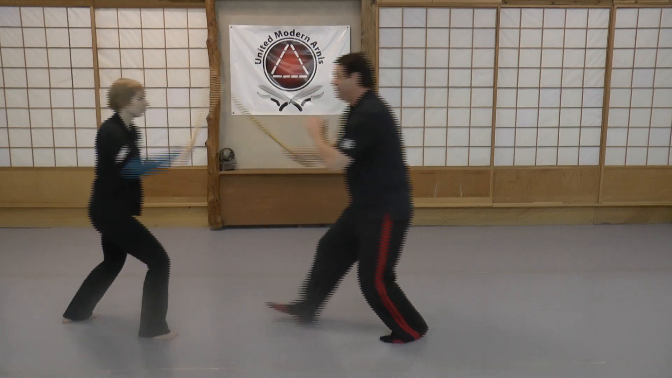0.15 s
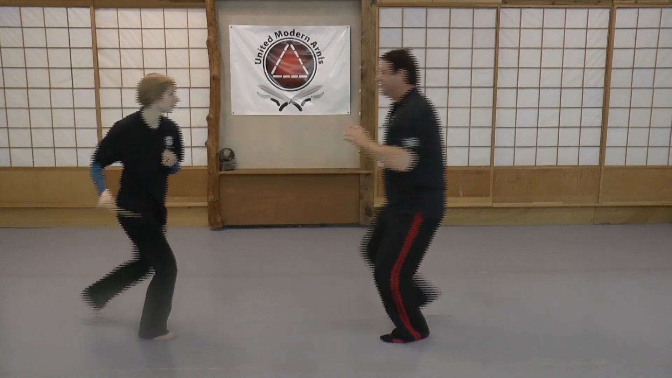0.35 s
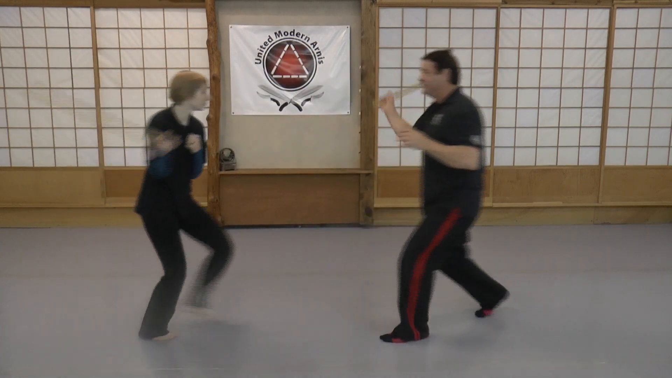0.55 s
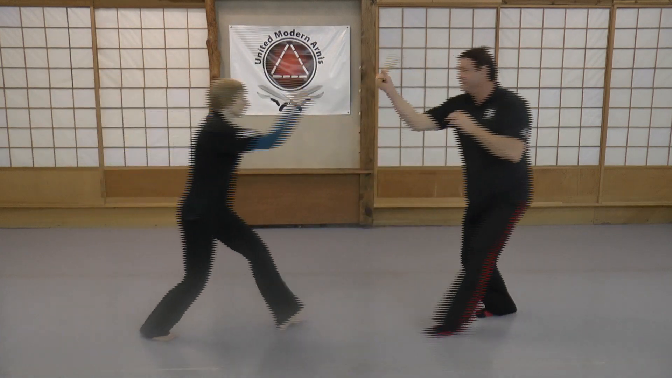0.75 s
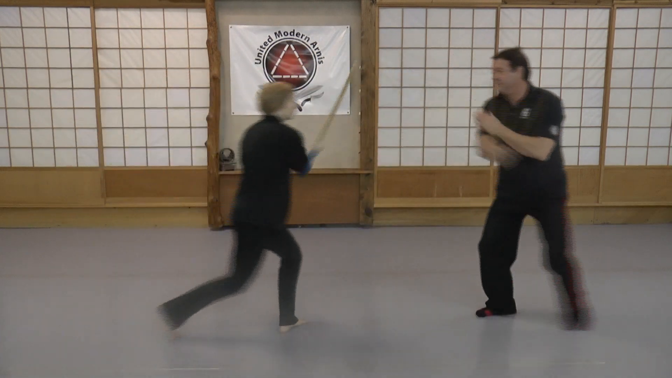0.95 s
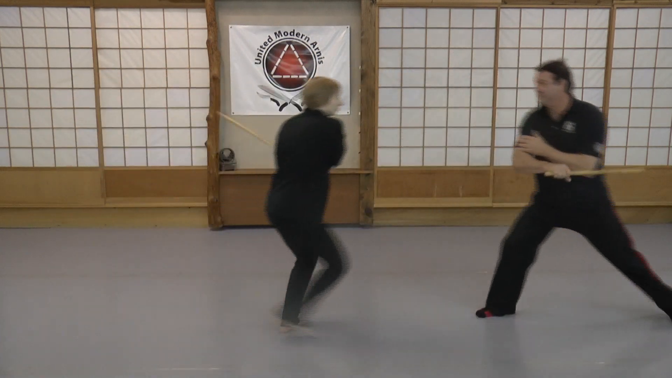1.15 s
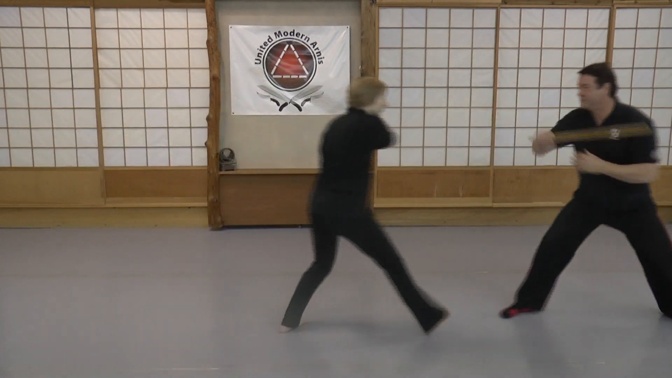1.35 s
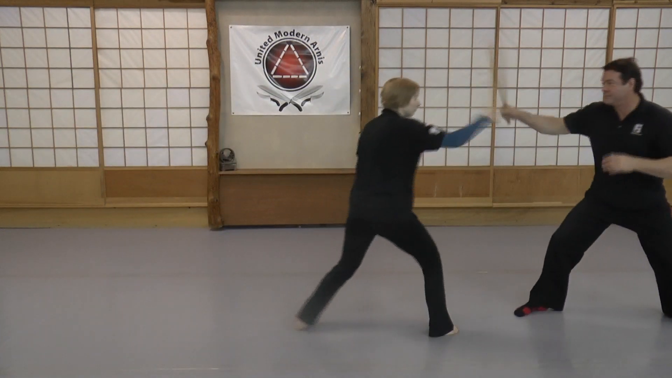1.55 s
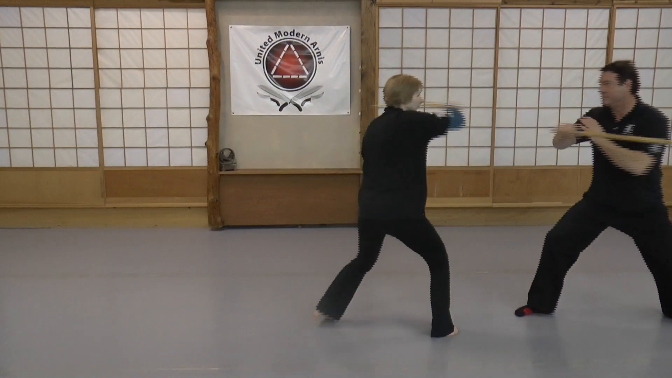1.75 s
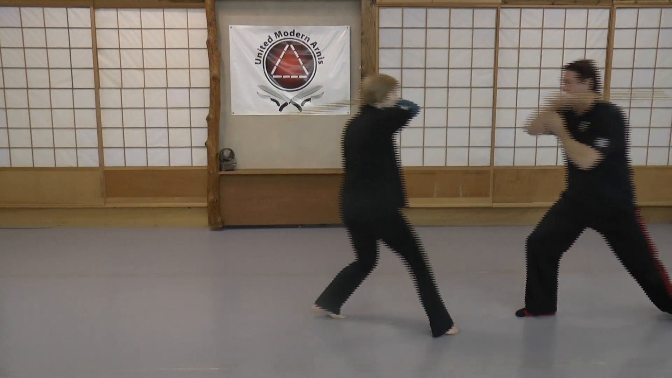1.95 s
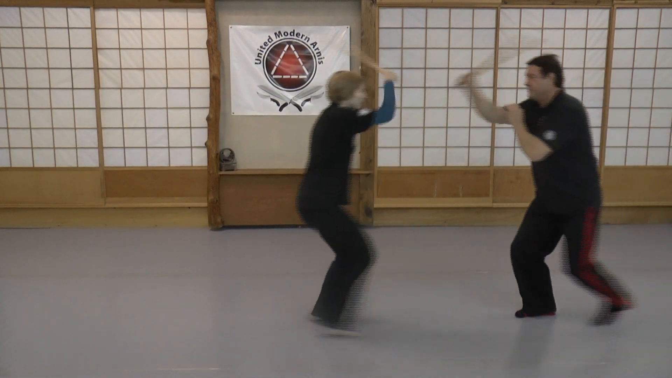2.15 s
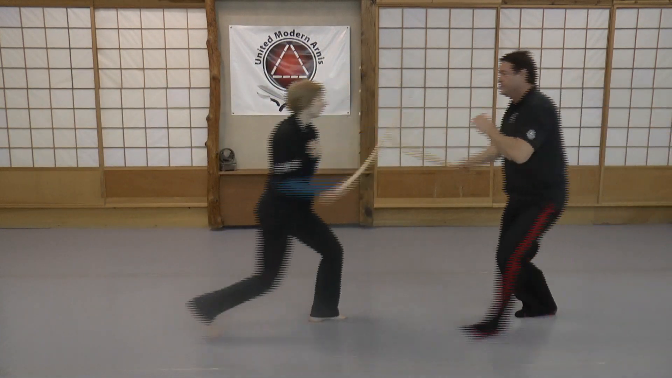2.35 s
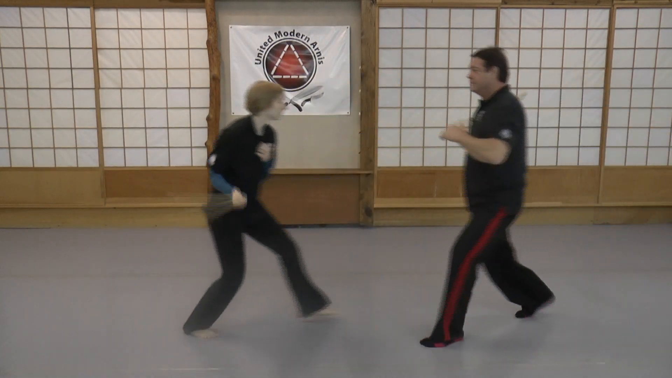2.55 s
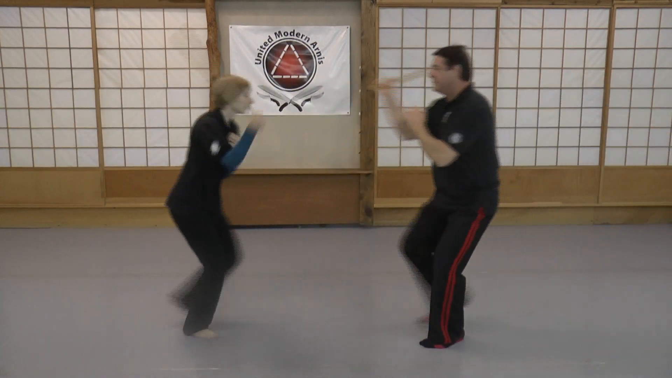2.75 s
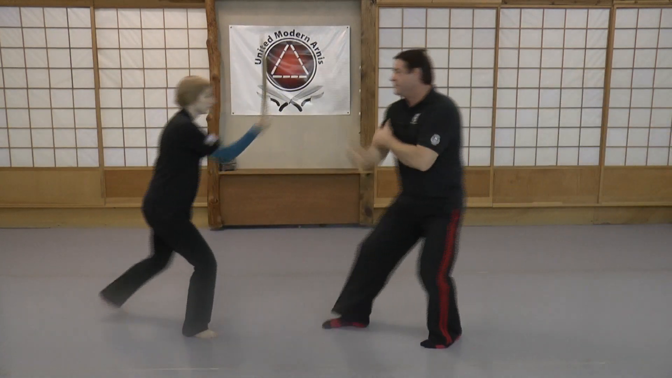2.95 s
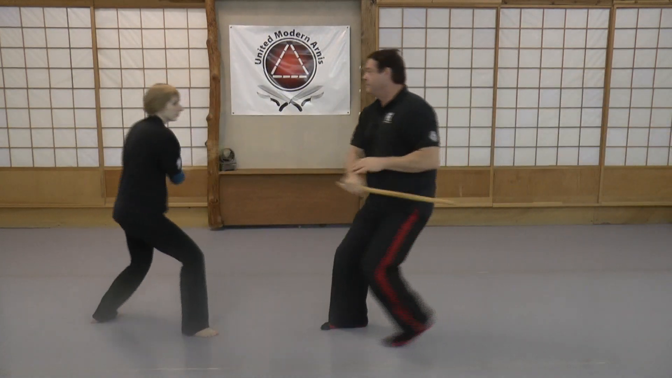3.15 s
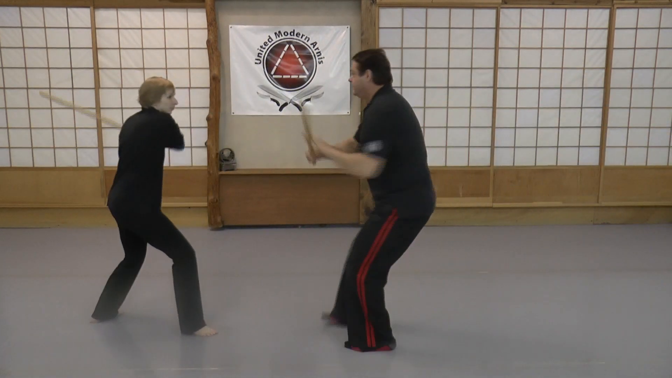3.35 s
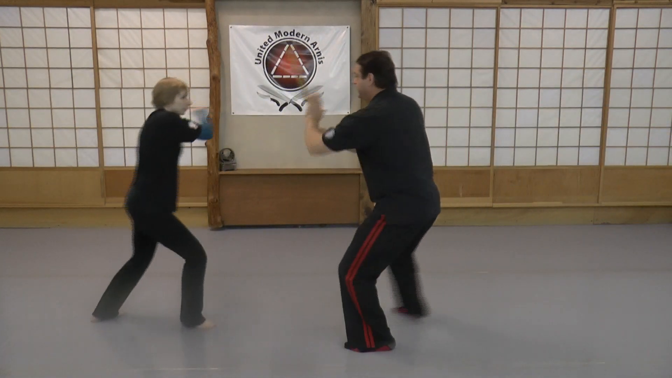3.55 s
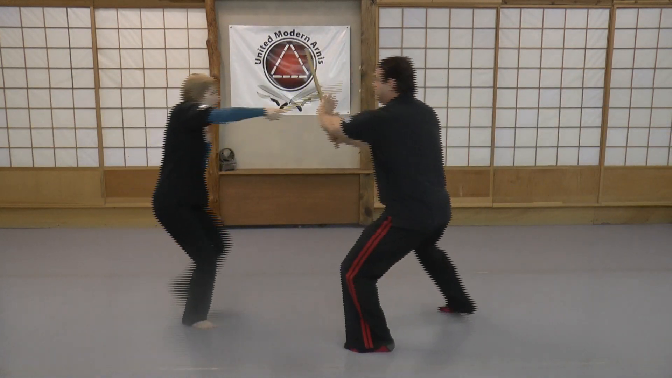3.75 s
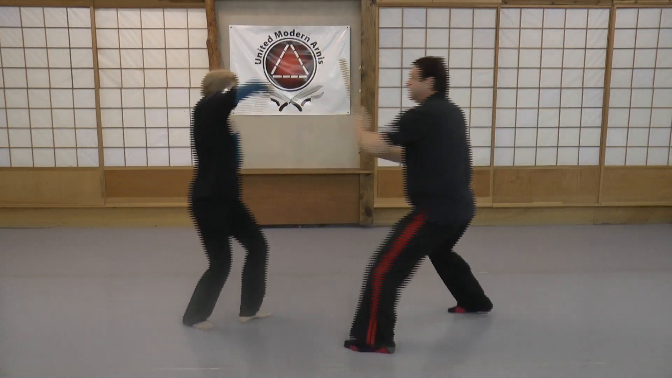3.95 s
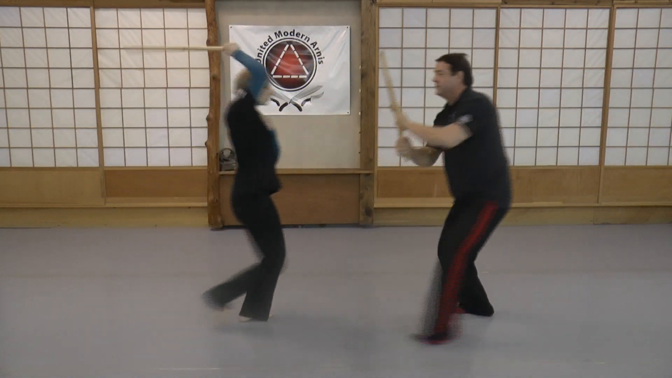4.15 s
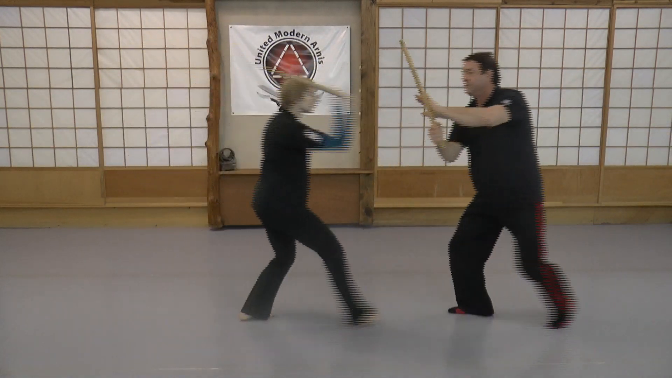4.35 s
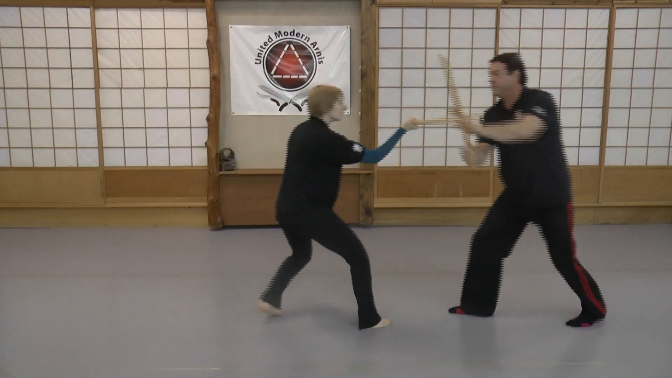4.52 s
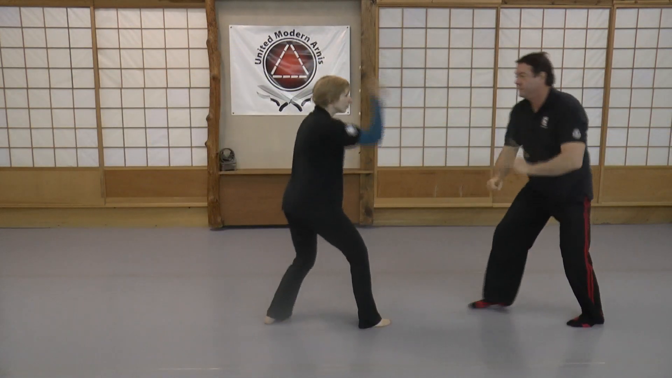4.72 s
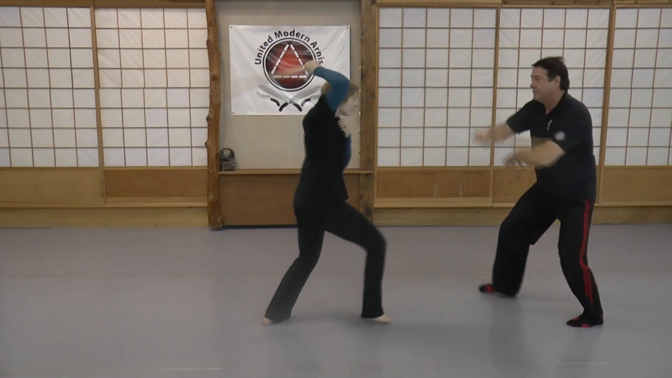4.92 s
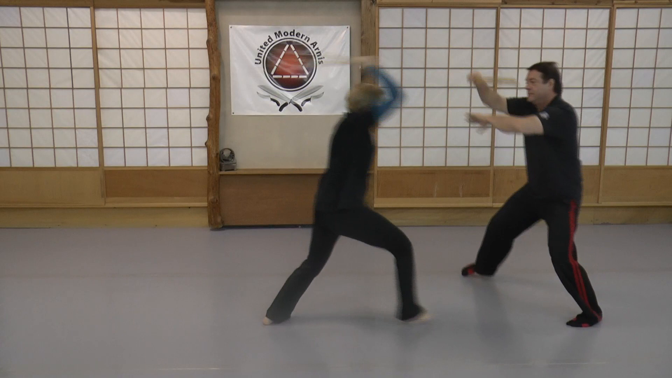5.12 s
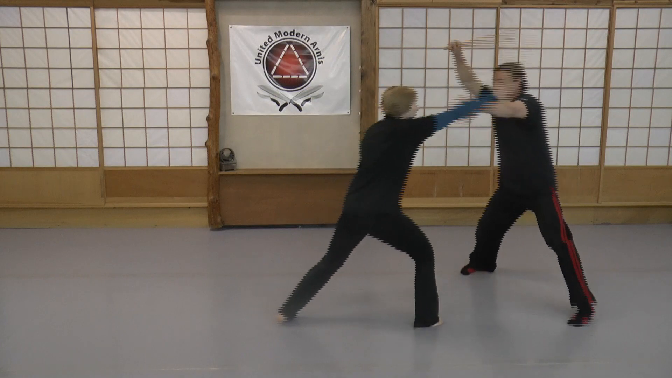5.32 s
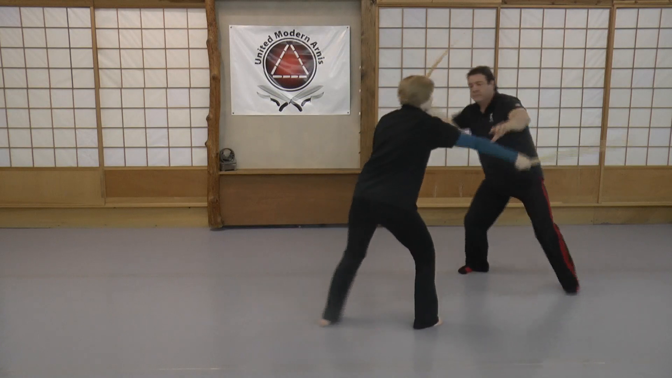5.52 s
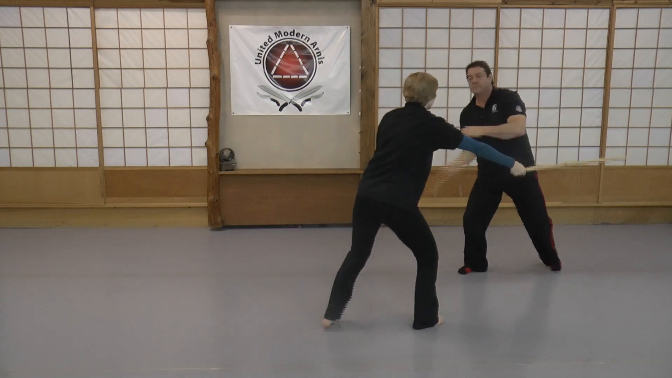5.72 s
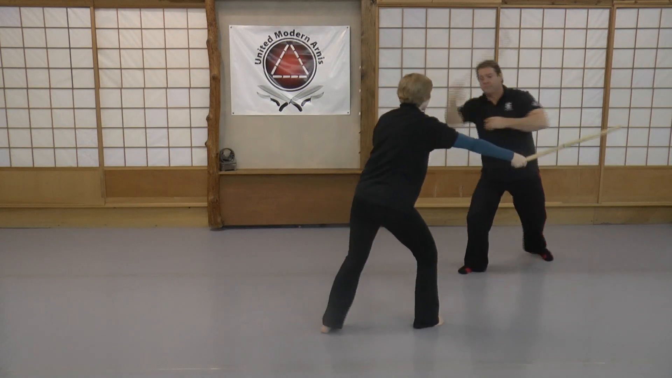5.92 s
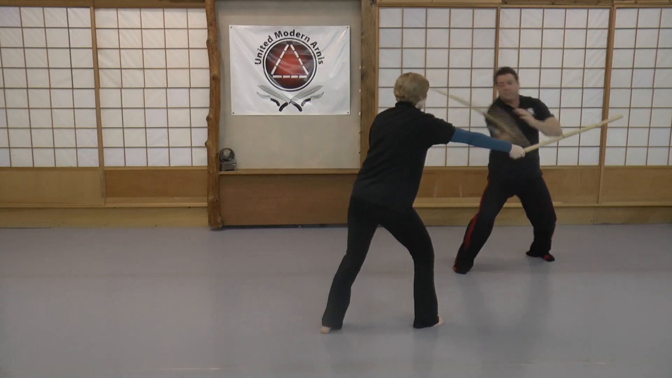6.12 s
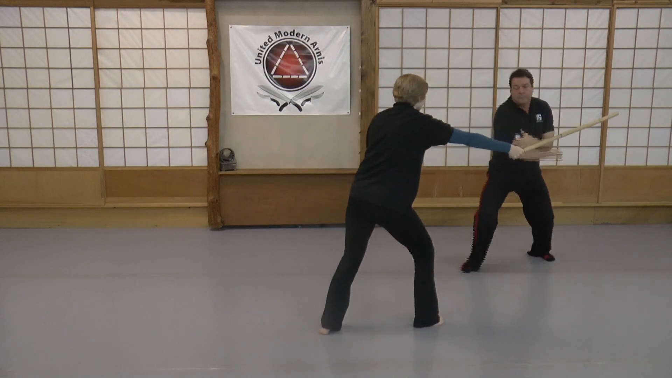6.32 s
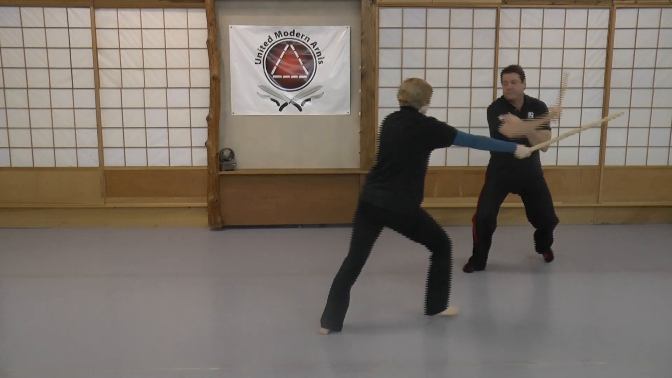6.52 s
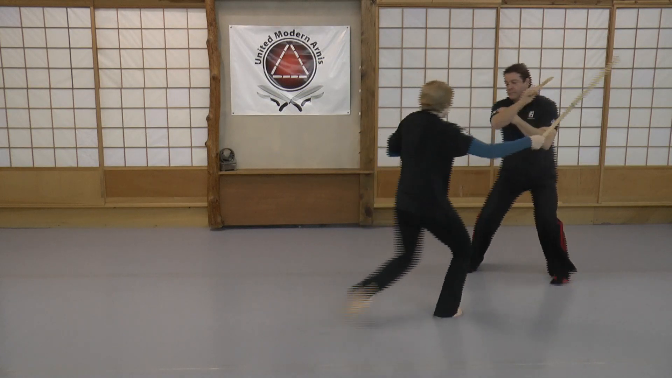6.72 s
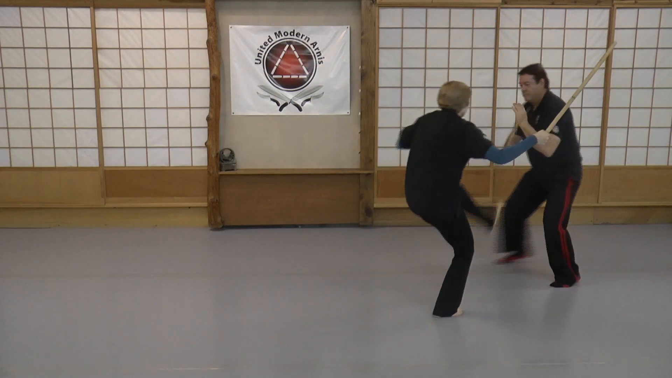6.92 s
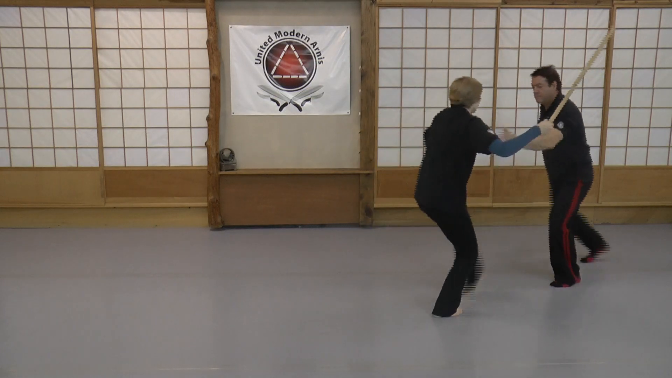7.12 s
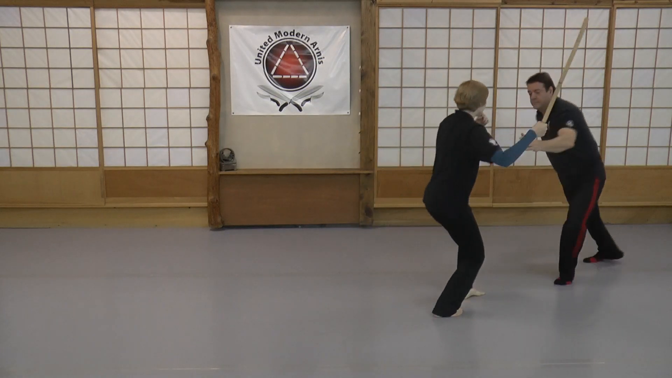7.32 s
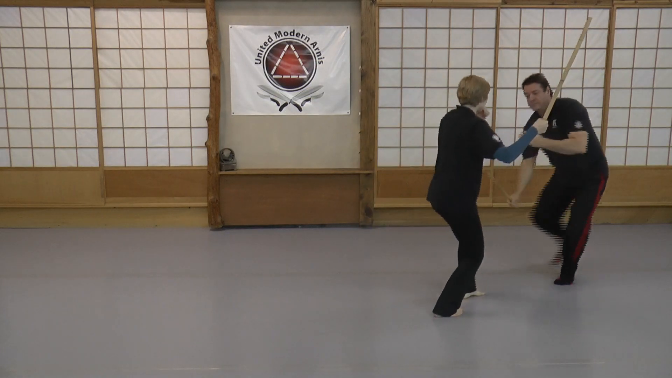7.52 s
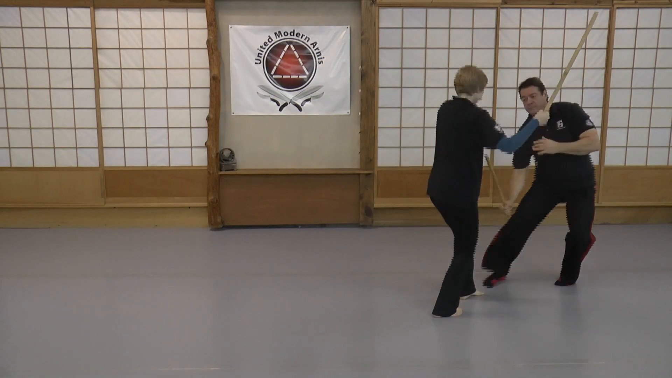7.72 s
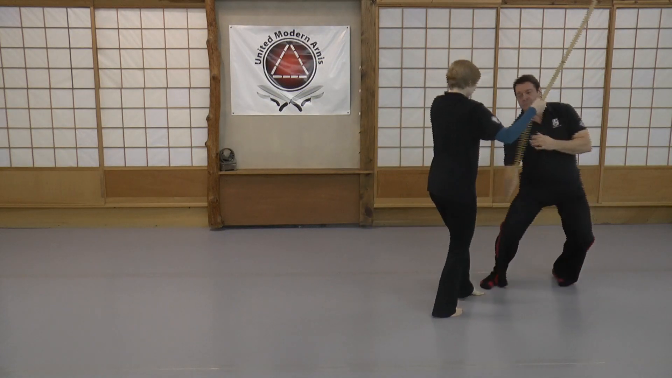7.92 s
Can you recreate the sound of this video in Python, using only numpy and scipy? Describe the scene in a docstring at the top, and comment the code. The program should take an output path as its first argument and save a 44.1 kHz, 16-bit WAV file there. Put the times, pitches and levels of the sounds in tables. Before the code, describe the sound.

A brisk two-person stick drill on a sprung floor: sharp, woody cracks with a short rattling contact and quick wall echoes, mixed with dull stamps, light scuffs and low rumble as weight shifts. The fifth crack is strongest, the later ones drier. The clacking then stops, leaving rustling clothes, a small close pat, a firm thud and fading room tone. The left side carries the action, squashed by automatic levelling; the right is nearly silent hiss.

```python
"""Stick drill in a training hall

Two people clack wooden sticks together, stamp and scuff on the mat, and land one dry pat on a forearm.
Each blow is a filtered click smeared by tiny contacts; the hall answers with a fading tail of noise.
The floor rumble and the sliding cloth are noise that swells with each movement. A fast limiter on the
left channel flattens each crack, so the hall swells up behind it; the right channel holds only hiss."""
import sys
import numpy as np
from scipy import signal
from scipy.fft import rfft, irfft, next_fast_len
from scipy.io import wavfile
from scipy.ndimage import uniform_filter1d, minimum_filter1d

SR = 44100
rng = np.random.default_rng(int(sys.argv[2]) if len(sys.argv) > 2 else 0)


def bounce(signal):
    """Save signal as a 16-bit WAV file at the path given by the first command-line argument."""
    frames = np.transpose(np.atleast_2d(signal))
    limited = np.clip(frames, -1, 1)
    pcm = np.round(limited * 32767).astype(np.int16)
    wavfile.write(sys.argv[1], SR, pcm)


N = 356003  # length in samples, about 8 s
# Source levels are those before the limiter. Levels in spectrum tables are relative.


def amp(db):
    """Turns dB into a plain multiplying factor."""
    return 10 ** (np.asarray(db) / 20)


def unit(x):
    """Scales a sound to rms 1."""
    return x / np.sqrt(np.mean(x ** 2) + 1e-20)


def read(points, hz):
    """Reads a table of (f/Hz, value), joined by straight lines on a log-frequency axis."""
    f, value = np.transpose(points)
    return np.interp(np.log(hz + 1), np.log(f + 1), value)


def add(mix, s, sound):
    """Mixes a sound in at time s, cutting it off at the end of the mix."""
    part = mix[max(round(s * SR), 0):][:len(sound)]
    part += sound[:len(part)]


def colour(x, gain_db, size=4096):
    """Filters a sound by a gain in dB that depends on frequency, with no sound ahead of the input."""
    hz = abs(np.fft.fftfreq(size, 1 / SR))
    log_gain = np.log(amp(gain_db(hz)))
    # minimum phase: the response starts at once
    spectrum = np.exp(np.conj(signal.hilbert(log_gain)))
    taps = np.fft.ifft(spectrum).real
    return signal.fftconvolve(x, taps[:size // 2])[:len(x)]


def noise(spectrum):
    """Steady noise of rms 1 with the given spectrum."""
    size = next_fast_len(N)
    hz = np.fft.rfftfreq(size, 1 / SR)
    shaped = rfft(rng.standard_normal(size)) * amp(read(spectrum, hz))
    return unit(irfft(shaped, size)[:N])


def sized(x, db):
    """Scales a blow so that its energy equals 10 ms at the given level."""
    return amp(db) * np.sqrt(SR / 100) * x / np.linalg.norm(x)


def knock(spectrum, db, size=2048):
    """One damped blow: a click filtered to the given spectrum and set to a level."""
    click = signal.unit_impulse(size)
    return sized(colour(click, lambda f: read(spectrum, f)), db)


def chatter(seconds, size=2048, count=10):
    """A short run of irregular micro-contacts with a nearly even spectrum and energy 1."""
    t = np.arange(size) / SR
    touching = np.exp(-(t / max(seconds, 1e-4)) ** 4)
    burst = rng.standard_normal(size)
    for _ in range(count):
        # keep the phases but make every frequency equally strong
        burst = irfft(np.exp(1j * np.angle(rfft(burst * touching))))
    burst = burst * touching
    return burst / np.linalg.norm(burst)


def rubbing(moves, spectrum, rise_s, fall_s, rest_db, lumpy_db):
    """Lumpy noise that swells into each movement of the bodies, holds, and dies away."""
    t = np.arange(N) / SR
    power = amp(rest_db) ** 2
    for start, length, db in moves:
        before = np.maximum(start - t, 0) / rise_s
        after = np.maximum(t - start - length, 0) / fall_s
        power = power + (amp(db) * np.exp(-before - after)) ** 2
    lumps = noise([(1, 0), (25, 0), (80, -40), (400, -100)])  # slow wobble, mostly below 25 Hz
    return noise(spectrum) * np.sqrt(power) * amp(lumpy_db * lumps)


# how fast the hall falls silent in each band: (f/Hz, time to fall by 60 dB t/s)
HALL_T60 = [(60, 1.1), (150, 1.77), (350, 1.584), (800, 1.14), (1500, 1.153), (3000, 0.96), (5000, 0.97),
            (8000, 0.66), (15000, 0.96)]
# tone colour of the hall at the start of its tail: (f/Hz, level/dB)
HALL_COLOUR = [(40, -15), (150, -1.5), (400, 0), (750, -4.5), (1500, 1.8), (4000, 1.6), (6000, 3),
               (9000, -3), (15000, -5)]


def hall(x, build_s=0.0028, flutter_db=0.89, size=65536):
    """The tail builds up, arrives in uneven clumps and dies at its own speed in each band, new each time."""
    hz, t, z = signal.stft(rng.standard_normal(size), SR, nperseg=512)
    clumps_db = flutter_db * rng.standard_normal(len(t))
    decay_db = -60 * t / read(HALL_T60, hz)[:, None]
    z = z * amp(read(HALL_COLOUR, hz)[:, None] + decay_db + clumps_db)
    build_up = np.sqrt(1 - np.exp(-np.arange(size) / SR / build_s))
    tail = signal.istft(z, SR, nperseg=512)[1] * build_up
    return signal.fftconvolve(x, tail / np.linalg.norm(tail))


# spectrum of the quiet air in the hall: (f/Hz, level/dB)
AIR_COLOUR = [(20, 7.5), (60, -3.5), (140, -11), (400, -11.5), (1000, -28.5), (2500, -46), (6000, -41.5),
              (11000, -42.5), (15000, -42.5)]


def air(level_db=-74):
    """The air of the hall: steady noise that never changes in level."""
    return amp(level_db) * noise(AIR_COLOUR)


# the fighters shift their weight: (start t/s, length t/s, level/dB)
SHIFTS = [(0.14, 0.2, -41.5), (0.81, 0.31, -46), (1.72, .24, -40.5), (2.11, 0.028, -46.5), (2.33, .26, -41),
          (3.06, 0.042, -36), (3.37, 0.11, -55.5), (3.99, 0.095, -36), (4.14, 0.26, -44.5),
          (4.65, 0.048, -50.5), (5.34, 0.16, -42), (5.62, 0.42, -51), (6.27, .25, -45.5), (7.4, .08, -45)]
# spectrum of the floor rumble: (f/Hz, level/dB)
RUMBLE_COLOUR = [(10, -5), (28, 6), (55, 1.5), (100, -4.5), (170, -13), (300, -25.5), (700, -52),
                 (2000, -65)]


def floor_rumble():
    """Shifting weight makes the floor swell in low noise and settle; it is never quite still."""
    return rubbing(SHIFTS, RUMBLE_COLOUR, rise_s=0.024, fall_s=0.05, rest_db=-62.5, lumpy_db=1.5)


# clothes and soles slide in the close grapple: (start t/s, length t/s, level/dB)
SLIDES = [(6.03, .07, -74), (6.22, 0.13, -67), (6.56, 0.064, -62), (6.86, 0.035, -69), (7.16, .1, -76)]
# spectrum of the sliding: (f/Hz, level/dB)
CLOTH_COLOUR = [(100, 1), (300, -1.5), (650, -2), (1300, -9), (3500, -18), (6000, -20), (12000, -20),
                (16000, -22.5)]


def sliding_cloth():
    """Clothes and soles rub with soft noise that rises and falls with each slide."""
    return rubbing(SLIDES, CLOTH_COLOUR, rise_s=0.058, fall_s=0.076, rest_db=-72.5, lumpy_db=1.2)


# the sprung floor and the panelling ring after a footfall:
# (f/Hz, level/dB against the slap, time to fall by 60 dB t/s)
BOARDS = [(137, -10, .6), (380.5, -8, 1.3), (665, -8, 0.58)]


def boards(slap_db, spread=0.019, count=3):
    """Each resonance of the woodwork is a few close, dying tones."""
    t = np.arange(SR) / SR
    out = np.zeros(SR)
    for hz, mode_db, t60 in BOARDS:
        detune = 1 + spread * rng.uniform(-1.3, 1, (count, 1))
        tones = np.sin(2 * np.pi * hz * detune * t).sum(0)
        out += sized(tones * amp(-60 * t / t60), slap_db + mode_db)
    return out


# footfalls, from stamps to light steps: (t/s, thud level/dB, slap level/dB, contact t/s)
STEPS = [(0.107, -33, -44, 0.0096), (0.837, -63, -47.5, 0.027), (1.1, -47, -53, 0.022),
         (1.4806, -29, -36.5, 0.012), (1.938, -45, -62, 0.02), (2.08, -56, -47, 0.011),
         (3.08, -43, -49, 0.023), (3.6389, -60, -50.5, 0.0059), (4.02, -53, -65, .016),
         (4.108, -60, -52.5, 0.016), (4.482, -28.5, -39, .0085), (5.2395, -29, -37.5, 0.0072),
         (6.133, -67, -63, 0.0061), (6.217, -46, -63, 0.013), (6.494, -58, -54, 0.0048),
         (6.6575, -66, -53.5, 0.0061), (6.974, -60, -57.5, 0.026), (7.218, -26, -30.5, .012),
         (7.6463, -67.5, -61, 0.0035)]
# the floor giving way: (f/Hz, level/dB)
THUD_COLOUR = [(25, -10), (70, -3.5), (140, 4.5), (220, -5.5), (380, -6.5), (520, -10.5), (900, -29.5),
               (2000, -47.5), (6000, -65)]
# the sole on the mat: (f/Hz, level/dB)
SLAP_COLOUR = [(60, -16.5), (300, -2), (500, 2), (660, 0), (900, -9), (1300, -13.5), (2200, -24),
               (4000, -28.5), (9000, -46), (16000, -60.5)]
# the sole brushes the mat just before it lands; the level is against the slap
TOUCH_LEAD_S, TOUCH_DB, TOUCH_S = 0.012, -20.5, 0.012
# a firm step wakes the hall more: the hall loses 3.5 dB per doubling of the contact time
STEP_HALL_DB, FIRM_S, SOFT_DB_PER_DOUBLING = -2.5, 0.0092, -3.5


def feet():
    """The sole brushes and slaps the mat and the weight thuds into the floor; boards and hall answer."""
    out = np.zeros(N)
    for s, thud_db, slap_db, contact in STEPS:
        slap = knock(SLAP_COLOUR, slap_db)
        blow = knock(THUD_COLOUR, thud_db) + slap
        brush = signal.fftconvolve(slap, chatter(TOUCH_S))
        add(out, s - TOUCH_LEAD_S, amp(TOUCH_DB) * brush)
        add(out, s, signal.fftconvolve(blow, chatter(contact)))
        add(out, s, boards(slap_db))
        hall_db = STEP_HALL_DB + SOFT_DB_PER_DOUBLING * np.log2(contact / FIRM_S)
        add(out, s, amp(hall_db) * hall(blow))
    return out


# one dry pat on a forearm: (level/dB, contact t/s, hall level/dB against the pat)
PAT = (-31, .0023, -24)
# spectrum of the pat: (f/Hz, level/dB)
PAT_COLOUR = [(100, 1), (450, -5), (600, -10), (880, 5), (1350, -0.5), (1780, -19), (2200, -3), (2750, 4),
              (3700, -2.5), (4700, -9.5), (7000, -24), (16000, -39)]


def pat(land_s=6.3468):
    """A close, damped pat on a forearm that hardly wakes the hall."""
    db, contact, hall_db = PAT
    out = np.zeros(N)
    blow = knock(PAT_COLOUR, db)
    add(out, land_s, signal.fftconvolve(blow, chatter(contact)))
    add(out, land_s, amp(hall_db) * hall(blow))
    return out


# bending modes of the hand-held sticks: (f/Hz, level/dB, width f/Hz)
STICK_MODES = [(1137, -7, 91), (1450, -3, 210), (1869, -0.05, 210), (2398, -0.5, 245), (2980, 2.5, 273),
               (3520, -6.5, 330), (3823, -1, 220), (4200, -5, 180), (4690, -3.5, 305), (5544, -10.5, 460),
               (6710, -16.5, 90), (7590, -24, 200)]
# spectrum of the crack of the contact itself: (f/Hz, level/dB)
CRACK_COLOUR = [(60, -9), (200, -5.5), (420, 0), (750, -0.5), (1200, 1.5), (3000, 0.5), (5000, -3.5),
                (7000, -8), (10000, -20.5), (16000, -32)]


def clack_db(f, bright, crack_db, favoured, reach_hz=120):
    """Spectrum of one blow: stick modes over the crack; the contact point favours a mode of each stick."""
    ring = sum(amp(db) ** 2 / (1 + ((f - hz) / width) ** 2) ** 2 for hz, db, width in STICK_MODES)
    crack = amp(crack_db + read(CRACK_COLOUR, f)) ** 2
    boost_db = sum(db * np.exp(-((f - hz) / reach_hz) ** 2) for hz, db in favoured)
    tilt_db = bright * np.log2((f + 400) / 3000)
    return 10 * np.log10(ring + crack) + boost_db + tilt_db


# stick on stick: (t/s, level/dB, brightness in dB per octave, crack level/dB,
#   f/Hz favoured by one stick, its boost level/dB, f/Hz favoured by the other, its boost level/dB,
#   contact t/s, hall level/dB against the blow)
CLACKS = [(0.1389, -16, 0.35, -10.5, 3775, 7, 1380, 2, 0.011, 3),
          (0.919, -14.5, -1, -12.5, 1784, 5, 1090, 6.6, 0.0074, -2.5),
          (1.6254, -17, -0.5, -11.5, 3060, 0.5, 1330, 5.5, 0.0078, -0.5),
          (2.3112, -17.5, 0.46, -11.5, 2850, 2.5, 5650, 6, .011, 2),
          (2.9748, -9, -1.2, -12, 2390, 8.5, 995, 7, 0.01, -4),
          (3.8011, -17.5, -1.14, -11, 2115, 6, 3290, 9.5, 0.007, -7.5),
          (4.5433, -14, -2.6, -9, 1930, 4.5, 3840, 5, 0.012, -10.5),
          (5.3514, -15.5, -1, -8, 2450, 5, 2020, 8, .0075, -14)]
# echoes off the walls and ceiling: (typical delay t/s, level/dB before the hall level is added)
ECHOES = [(0.02, -7.5), (.034, -7.5), (0.0569, -10.5), (.072, -18)]


def sticks(size=2048):
    """The sticks chatter on contact and ring briefly; walls and hall answer."""
    out = np.zeros(N)
    for s, db, bright, crack_db, hz_a, db_a, hz_b, db_b, contact, hall_db in CLACKS:
        favoured = [(hz_a, db_a), (hz_b, db_b)]
        click = signal.unit_impulse(size)
        blow = colour(click, lambda f: clack_db(f, bright, crack_db, favoured))
        direct = sized(signal.fftconvolve(blow, chatter(contact)), db)
        add(out, s, direct)
        for delay, wall_db in ECHOES:
            echo_s = s + delay * rng.uniform(0.9, 1.1)
            add(out, echo_s, amp(wall_db + hall_db) * direct)
        add(out, s, hall(sized(blow, db + hall_db)))
    return out


def scene():
    """Sticks, pat and feet over the rumbling floor, sliding cloth and the air of the hall."""
    background = air() + floor_rumble() + sliding_cloth()
    return (background + feet() + pat() + sticks())[None]


def limiter(x, threshold_db=-21, share=0.69, recovery_db_per_s=220):
    """Takes off a share of each peak's excess almost at once; the remembered peak then sinks steadily."""
    peak_db = 20 * np.log10(1e-9 - minimum_filter1d(-abs(x), size=16))
    fall = np.arange(N) * recovery_db_per_s / SR
    held_db = np.maximum.accumulate(peak_db + fall) - fall
    over_db = np.maximum(held_db - threshold_db, 0)
    return x / amp(share * uniform_filter1d(over_db, size=16))


# spectrum of the hiss of the unused input: (f/Hz, level/dB)
IDLE_COLOUR = [(20, -1), (300, -13.5), (1500, -19), (5000, -19), (15000, -18)]


def idle_hiss(level_db=-73.5):
    """An input with nothing feeding it gives only steady hiss."""
    return amp(level_db) * noise(IDLE_COLOUR)


def record(dry, left_db=6, edge_hz=16000):
    """The limited microphone on the left, idle hiss on the right, then a cut above the band edge."""
    pair = np.array([amp(left_db) * limiter(dry[0]), idle_hiss()])
    low_pass = signal.firwin(255, edge_hz, window=("kaiser", 9), fs=SR)
    return signal.oaconvolve(pair, low_pass[None], "same")


dry = scene()
out = record(dry)
bounce(out)
```